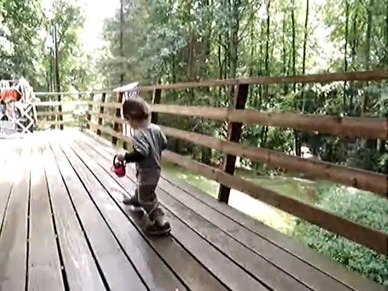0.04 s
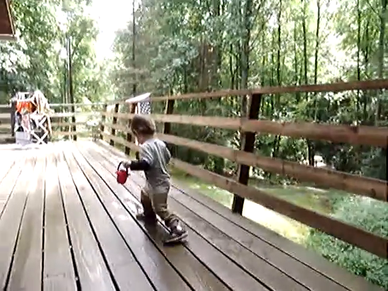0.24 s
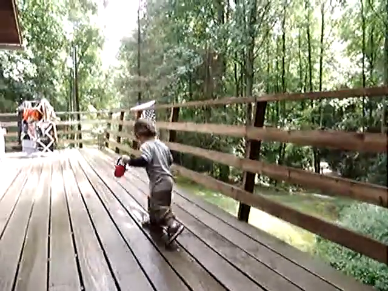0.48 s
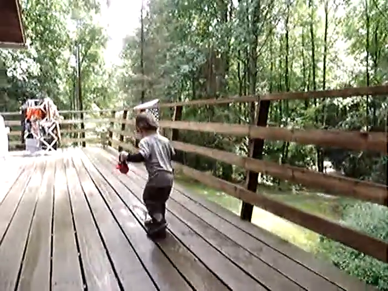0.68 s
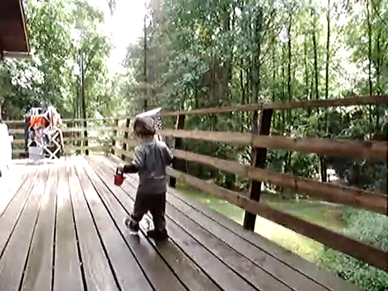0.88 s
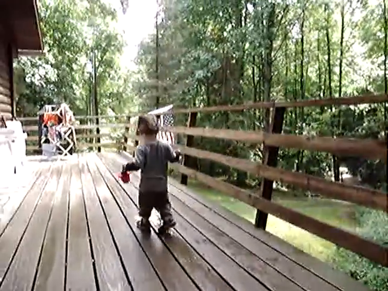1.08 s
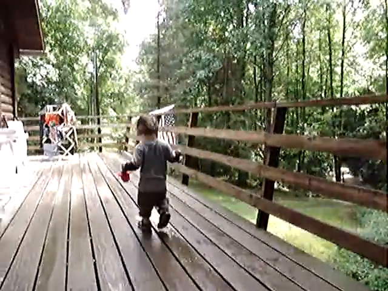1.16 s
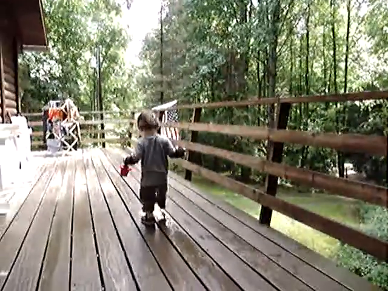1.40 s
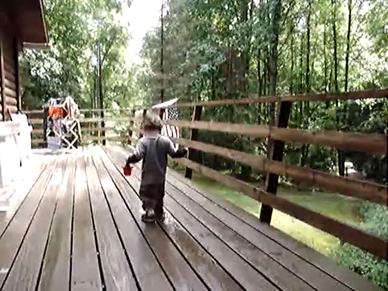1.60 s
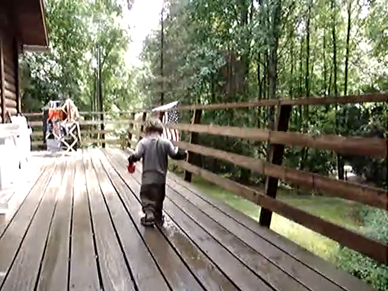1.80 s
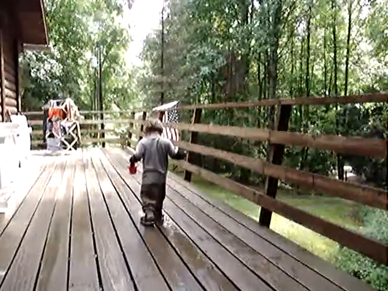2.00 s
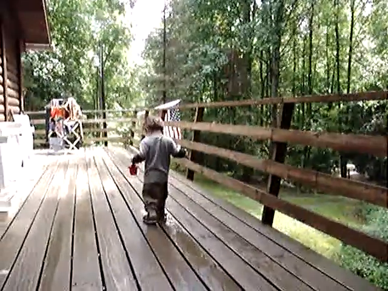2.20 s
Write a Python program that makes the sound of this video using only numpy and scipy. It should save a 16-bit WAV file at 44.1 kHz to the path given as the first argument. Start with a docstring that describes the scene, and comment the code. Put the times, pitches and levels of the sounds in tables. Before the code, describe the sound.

Small shoes stamp once, tap and scuff on wooden boards over a soft outdoor rush.

```python
"""Damp wooden deck in the woods. A toddler walks: one hard stamp, a few faint steps, a scuffing step.
Stamp and scuffing step ring the plank, then the joists; the sole slaps and drags over grit.
The faint steps are light shoe taps. Behind: a steady rush of the woods, three faint far notes."""
import sys
import numpy as np
from scipy import signal
from scipy.fft import rfft, irfft, next_fast_len
from scipy.io import wavfile
from scipy.ndimage import uniform_filter1d

SR = 44100
rng = np.random.default_rng(int(sys.argv[2]) if len(sys.argv) > 2 else 0)


def materialize(psi):
    """Save the field psi as 16-bit PCM at rate SR to the path in sys.argv[1].

    A 1-D psi becomes a single channel; in a 2-D psi each row is a channel.
    """
    bounded = np.clip(np.atleast_2d(psi).T, -1, 1)
    quanta = np.round(bounded * 32767).astype(np.int16)
    wavfile.write(sys.argv[1], SR, quanta)


N = 99225

# footfalls loading the plank (time [s], plank gain [dB], joist gain [dB])
FOOTFALLS = [(0.1705, -19.5, -31), (1.611, -39, -39), (1.635, -45, -49)]
# plank modes (frequency [Hz], gain [dB], t60 [s])
PLANK_MODES = [(229, -10.5, 0.25), (281, -2.5, 0.12), (298.8, -2.5, .1), (377, -22, 0.21), (443, -10, .11),
               (540, -29, .7), (972, -10, 0.094), (1235, -6, 0.065), (1454, -9, 0.047), (1420, -2, 0.031),
               (2453, -15, 0.047), (2768, -4.5, 0.059), (3490, -20, 0.039), (6977, -26, 0.049)]
# joist modes (frequency [Hz], gain [dB], t60 [s])
JOIST_MODES = [(55.6, -24, 0.96), (101.4, -10, 0.18), (130.5, -8.5, 0.31), (172, -13, 0.32)]
# deck rumble spectrum (frequency [Hz], relative density [dB])
DECK_SPECTRUM = [(40, -30), (100, -10), (170, -6), (280, -2.5), (550, -5), (1200, -14.5), (3000, -16),
                 (6000, -40.5), (10000, -58.5)]
# hard sole hitting wood (time [s], gain [dB])
SOLE_HITS = [(0.1718, -15.5), (0.1733, -18), (0.1739, -13.5), (0.176, -11.5), (0.1807, -23), (0.188, -28),
             (0.2065, -49), (1.612, -38), (1.630, -38), (1.632, -26)]
# slap spectrum (frequency [Hz], relative density [dB])
SLAP_SPECTRUM = [(100, -32), (300, -3), (600, -3.5), (900, -6.5), (1400, -1), (2700, 1), (4200, -7.5),
                 (6500, -7), (10000, -18)]
# sole and plank resonances (frequency [Hz], width [Hz], gain [dB])
SLAP_RESONANCES = [(1040, 58, 2), (1335, 69, 8.5), (1473, 130, 9), (2510, 330, -4.5), (2620, 160, 9),
                   (3070, 53, 0), (3550, 120, 6), (4850, 130, 5), (6940, 180, 0.5)]
# sole dragging over grit (time [s], gain [dB], decay [s])
SOLE_DRAGS = [(0.177, -30, 0.0071), (0.184, -26, 0.0034), (0.213, -46, .018), (1.6323, -28, 0.01),
              (1.64, -38.5, 0.017), (1.67, -53.5, 0.024)]
# grit spectrum (frequency [Hz], relative density [dB])
GRIT_SPECTRUM = [(200, -13), (1000, 4), (2000, 1), (3600, 5.5), (4700, 2), (7000, 7), (8500, 1),
                 (10000, -5.5)]
# shoe taps and soft bumps (time [s], gain [dB], centre [Hz], decay [s])
SHOE_TAPS = [(0.4499, -34, 2125, 0.0023), (0.459, -47, 2350, 0.042), (0.940, -39, 2700, 0.0024),
             (0.952, -49, 4000, 0.0066), (1.043, -47, 690, 0.015), (1.060, -56, 155, 0.02),
             (1.128, -50, 3600, 0.0065), (1.181, -47.5, 4840, 0.015), (1.190, -59, 5740, 0.011),
             (1.200, -46.5, 527, 0.011), (1.633, -41, 346, 0.0091), (1.657, -45.5, 112.6, 0.014),
             (2.187, -54, 6850, .008)]
# woods rush spectrum (frequency [Hz], relative density [dB])
RUSH_SPECTRUM = [(15, -52), (25, -24), (48, -17), (145, -14), (186, -6.5), (216, -10), (245, -6.5),
                 (314, -4), (356, -6.5), (384, -4.5), (470, -8), (546, -3), (667, -6.5), (719, -5.5),
                 (924, -6.5), (1190, -2.5), (1310, -4), (1490, -2.5), (2520, -2), (3000, -6), (4830, -15),
                 (6870, -14), (10000, -24.5), (13000, -101), (22000, -120)]
# woods rush envelope (time [s], level [dB])
RUSH_LEVELS = [(0, -48.5), (.1, -48.5), (.35, -47.5), (.49, -48), (.6, -48), (.86, -49), (.99, -47),
               (1.15, -48), (1.27, -48), (1.39, -48), (1.5, -49.5), (1.72, -49), (1.9, -49), (2.0, -48),
               (2.25, -49.5)]
# far notes (peak time [s], level [dB], centre [Hz])
FAR_NOTES = [(0.08, -52, 1090), (1.98, -51, 1178), (2.22, -54.5, 1210)]

PLANK_RISE_S, JOIST_LAG_S, JOIST_RISE_S = 0.0023, 0.0128, 0.0091
DECK_DB, DECK_RISE_S, DECK_DECAY_S = -11.5, 0.0063, 0.043
CLICK_DB, CLICK_WIDTH_S = 4, 0.00003
SLAP_DB, SLAP_DECAY_S, DIRECT_DB = -13, 0.0021, -1
RATTLE_DB, RATTLE_DECAY_S = -25.5, 0.0082
GRIT_PER_S, GRIT_SPREAD_DB = 19000, 2.5
SCUFF_RISE_S, SCUFF_TAIL_DB, SCUFF_TAIL_S = 0.00078, -38, 0.27
TAP_DB_PER_OCTAVE, TAP_RISE_S = -27.5, 0.000093
FLUTTER_DB, FLUTTER_PER_S = 1.2, 33
NOTE_WIDTH_HZ, NOTE_SIGMA_S = 80, 0.017
CUTOFF_HZ = 10060


def deck_boards():
    """Plank rings at once, joists follow, the rest of the deck rumbles on."""
    modes, envelope = 0, 0
    for start_s, plank_db, joist_db in FOOTFALLS:
        modes += undb(plank_db) * ring(start_s, PLANK_MODES, PLANK_RISE_S)
        modes += undb(joist_db) * ring(start_s + JOIST_LAG_S, JOIST_MODES, JOIST_RISE_S)
        envelope += undb(plank_db) * burst(start_s, DECK_RISE_S, DECK_DECAY_S)
    rumble = colour(envelope * rng.standard_normal(N), DECK_SPECTRUM)
    return modes + undb(DECK_DB) * rumble


def sole_slaps():
    """Per contact: sharp click, short slap, weaker rattle, all sounding through the wood."""
    clicks, power = 0, 0
    for start_s, db in SOLE_HITS:
        t = since(start_s)
        click = np.exp(-((since(0) - start_s) / CLICK_WIDTH_S) ** 2)
        clicks += undb(db + CLICK_DB) * click / click.sum()
        slap = undb(SLAP_DB) * np.exp(-t / SLAP_DECAY_S)
        rattle = undb(RATTLE_DB) * np.exp(-t / RATTLE_DECAY_S)
        power += (undb(db) * (slap + rattle) * (t > 0)) ** 2
    force = colour(clicks + np.sqrt(power) * sign_noise(), SLAP_SPECTRUM)
    body = sum(undb(db) * band(force, hz, width_hz) for hz, width_hz, db in SLAP_RESONANCES)
    return undb(DIRECT_DB) * force + body


def sole_scuffs():
    """Dense grit clicks under the sliding sole, with a faint tail."""
    grit = (rng.random(N) < GRIT_PER_S / SR) * sign_noise()
    grit *= undb(GRIT_SPREAD_DB * rng.standard_normal(N))
    drag = 0
    for start_s, db, decay_s in SOLE_DRAGS:
        tail = undb(SCUFF_TAIL_DB) * burst(start_s, SCUFF_RISE_S, SCUFF_TAIL_S)
        drag += undb(db) * (burst(start_s, SCUFF_RISE_S, decay_s) + tail)
    return colour(unit(grit) * drag, GRIT_SPECTRUM)


def shoe_taps():
    """Dry ticks and soft bumps: noise bursts, each around its own pitch."""
    skirt_db = 2 * TAP_DB_PER_OCTAVE
    taps = 0
    for start_s, db, hz, decay_s in SHOE_TAPS:
        tick = burst(start_s, TAP_RISE_S, decay_s) * sign_noise()
        taps += undb(db) * colour(tick, [(hz / 4, skirt_db), (hz, 0), (hz * 4, skirt_db)])
    return taps


def woods_rush():
    """Distant rush, swelling gently; each half octave flutters independently."""
    edges_hz = np.geomspace(20, SR / 2, num=21)
    hz = np.arange(N // 2 + 1) * SR / N
    spectrum = rfft(colour(rng.standard_normal(N), RUSH_SPECTRUM))
    rush = 0
    for low_hz, high_hz in zip(edges_hz, edges_hz[1:]):
        half_octave = irfft(spectrum * ((hz >= low_hz) & (hz < high_hz)), N)
        rush += half_octave * undb(FLUTTER_DB * wander(FLUTTER_PER_S))
    level_db = np.interp(since(0), *np.array(RUSH_LEVELS).T)
    return unit(rush) * undb(level_db)


def far_notes():
    """Short blurred notes of narrow-band noise, perhaps a distant bird."""
    notes = 0
    for peak_s, db, hz in FAR_NOTES:
        envelope = np.exp(-0.5 * ((since(0) - peak_s) / NOTE_SIGMA_S) ** 2)
        noise = band(rng.standard_normal(N), hz, NOTE_WIDTH_HZ)
        notes += undb(db) * envelope * unit(band(noise, hz, NOTE_WIDTH_HZ))
    return notes


def undb(db):
    """dB to gain."""
    return 10 ** (np.asarray(db) / 20)


def unit(x):
    """Scale to rms 1."""
    return x / np.sqrt(np.mean(x ** 2))


def since(start_s):
    """Seconds since start, zero before."""
    return np.maximum(np.arange(N) / SR - start_s, 0)


def burst(start_s, rise_s, decay_s):
    """Rounded attack, exponential decay."""
    t = since(start_s)
    return (1 - np.exp(-t / rise_s)) * np.exp(-t / decay_s)


def ring(start_s, modes, rise_s):
    """Damped modes, common onset."""
    t = since(start_s)
    ringing = sum(undb(db - 60 * t / t60_s) * np.sin(2 * np.pi * hz * t) for hz, db, t60_s in modes)
    return (1 - np.exp(-t / rise_s)) * ringing


def sign_noise():
    """White noise of +1 and -1."""
    return np.sign(rng.standard_normal(N))


def wander(rate_per_s):
    """Smooth random drift, rms 1."""
    hold = int(SR / rate_per_s)
    stairs = np.repeat(rng.standard_normal(N // hold + 1), hold)
    return unit(uniform_filter1d(uniform_filter1d(stairs, hold), hold)[:N])


def band(x, hz, width_hz):
    """Resonance, gain 1 at centre."""
    return signal.lfilter(*signal.iirpeak(hz, hz / width_hz, fs=SR), x)


def colour(x, points):
    """Minimum-phase filter from (frequency [Hz], relative gain [dB]); keeps white-noise power."""
    size = 2 * next_fast_len(N)
    hz, db = np.array(points).T
    bins_hz = np.arange(size // 2 + 1) * SR / size
    gain = unit(undb(np.interp(np.log(bins_hz + 1), np.log(hz), db)))
    cepstrum = irfft(np.log(gain))
    cepstrum[1:size // 2] *= 2
    cepstrum[size // 2 + 1:] = 0
    return irfft(rfft(x, size) * np.exp(rfft(cepstrum)))[:N]


def scene():
    """Footsteps in front of the woods, mono."""
    footsteps = deck_boards() + sole_slaps() + sole_scuffs() + shoe_taps()
    return (footsteps + woods_rush() + far_notes())[None]


def record(dry):
    """Steep treble cut."""
    lowpass = signal.ellip(10, rp=0.2, rs=70, Wn=CUTOFF_HZ, fs=SR, output="sos")
    return signal.sosfilt(lowpass, dry)


dry = scene()
out = record(dry)
materialize(out)
```